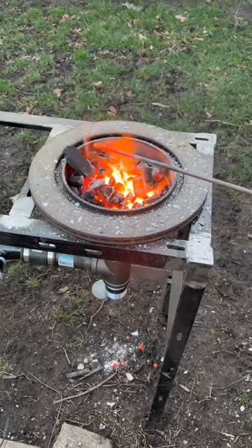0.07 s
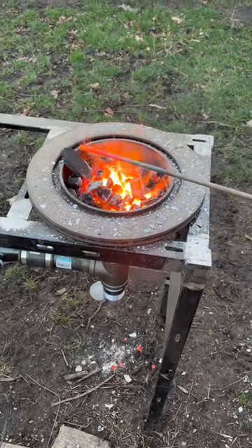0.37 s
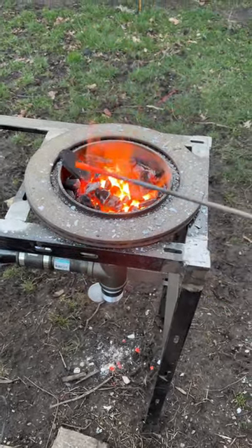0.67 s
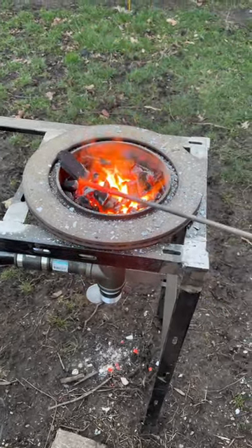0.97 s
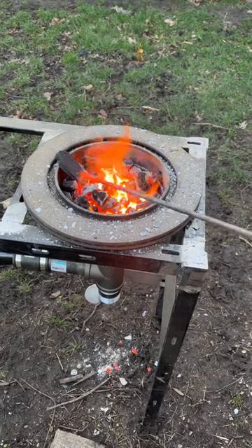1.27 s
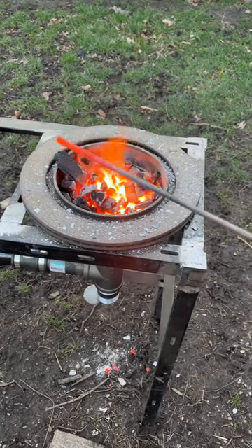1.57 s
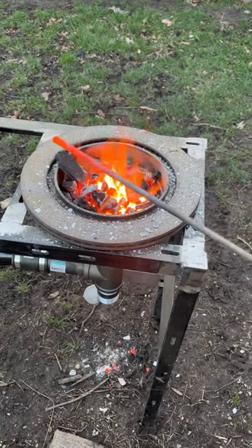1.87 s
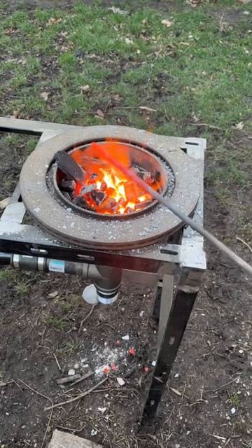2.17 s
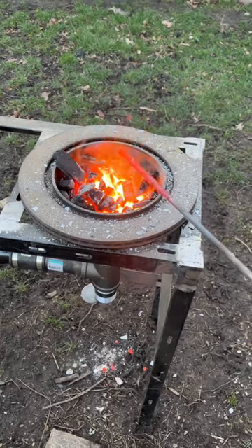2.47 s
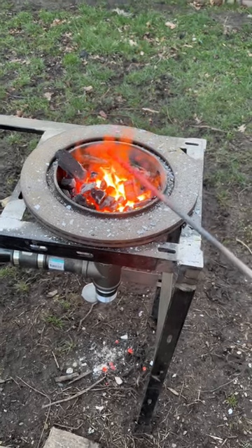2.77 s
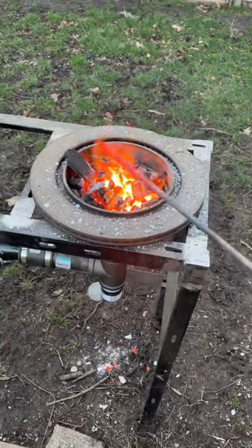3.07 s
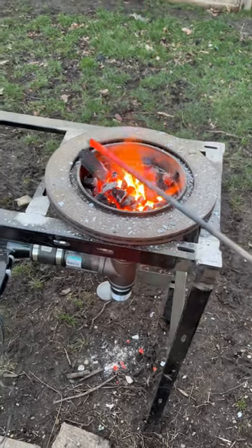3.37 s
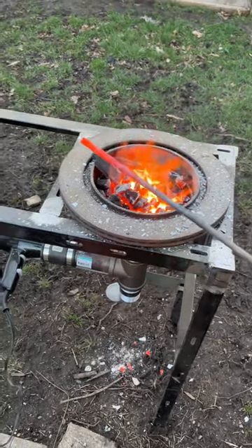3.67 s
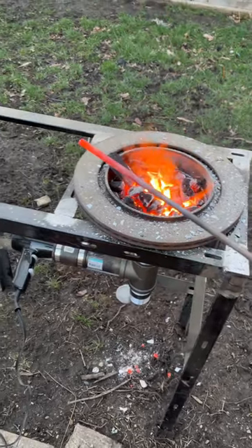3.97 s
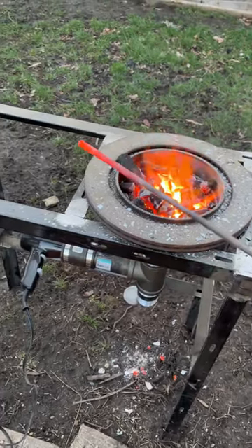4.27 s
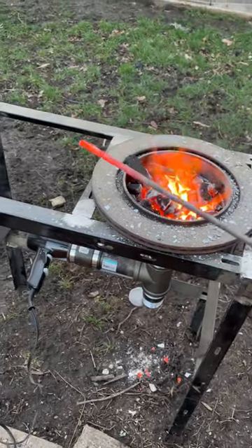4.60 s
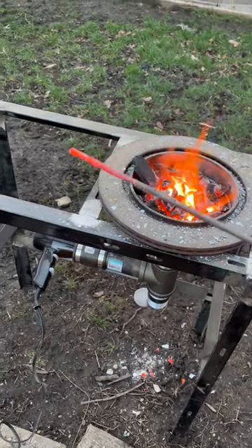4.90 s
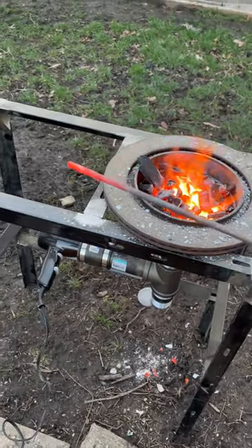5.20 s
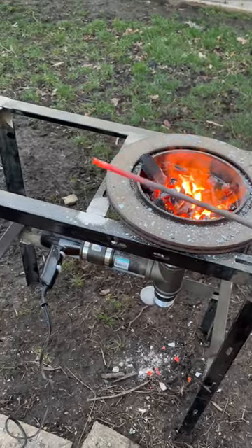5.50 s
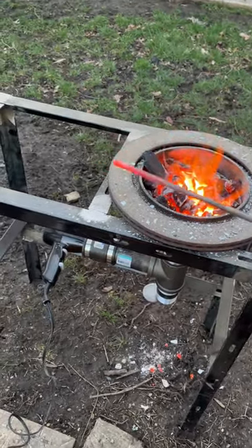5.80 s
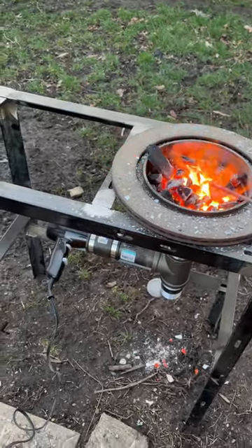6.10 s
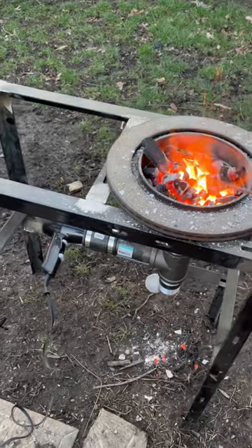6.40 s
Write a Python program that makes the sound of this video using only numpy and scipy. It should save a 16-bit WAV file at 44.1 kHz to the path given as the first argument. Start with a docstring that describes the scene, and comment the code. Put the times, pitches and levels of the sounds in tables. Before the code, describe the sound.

Heard from a hand-held microphone a step from an outdoor coal forge, an electric blower runs throughout with a constant mid-pitched note and air rushing through a pipe. The flames add an even, low roar. Two crisp coal snaps come early, with scattered lighter crackles after them and another clear snap near the end. Far off, an engine faintly gathers speed during the second half.

```python
"""An electric blower feeds a small outdoor forge, heard from a hand-held microphone a step away.
Its blades chop the air into a note at four times the shaft rate, turbulence excites the resonances
of housing and pipe, and the motor adds a fine high whine. The fire rumbles, and now and then a coal
fractures with a snap. Far off, an engine gathers speed, swelling and fading as it climbs."""
import sys
import numpy as np
from scipy import signal
from scipy.fft import rfft, irfft, next_fast_len
from scipy.io import wavfile
from scipy.ndimage import uniform_filter1d, map_coordinates

SR = 44100
rng = np.random.default_rng(int(sys.argv[2]) if len(sys.argv) > 2 else 0)


def store_wav(level_fs):
    """Save 16-bit WAV to argv[1]."""
    pcm = np.round(np.clip(np.atleast_2d(level_fs), -1, 1) * 32767)
    wavfile.write(sys.argv[1], SR, pcm.T.astype(np.int16))


N = 293265

# Blade-passing frequency of the blower. Each row: time in seconds, frequency in Hz.
BLADE_PITCH = [(0.1, 622.4), (1.3, 623.8), (1.95, 620.2), (2.3, 621.4), (2.6, 621.7), (3.45, 622.7),
               (3.85, 624.7), (4.35, 624), (4.9, 621.5), (5.3, 622.9), (6.55, 624.4)]
# Spectrum of the rushing air. Each row: frequency in Hz, relative spectral density in dB.
AIR_SPECTRUM = [(120, -47), (260, -19.5), (450, -17), (520, -13.5), (585, -5.5), (670, -3.5), (800, -14),
                (1050, -26), (1900, -25.5), (2350, -30.5), (4300, -32), (5700, -33.5), (6400, -31),
                (7200, -31.5), (8200, -33.5), (10000, -43), (12200, -38), (13500, -47), (14500, -52),
                (16000, -66)]
# Resonances of housing and pipe. Each row: centre in Hz, width in Hz, lift in dB.
DUCT_MODES = [(350, 89, 5.5), (583, 97, 3), (891.6, 145, 10.5), (1239, 130, 8), (1504, 206, 9.0),
              (1757, 154, 7), (2017, 150, 7.5), (2189, 70, 8), (2477, 160, 8.5), (2763, 220, 6.5),
              (3206, 290, 9), (3724, 73, 7), (4130, 230, 6.5), (4660, 100, 8.5), (5130, 340, 6)]
# Partials of the motor whine. Each row: multiple of the shaft rate, relative level in dB.
MOTOR_ORDERS = [(7, -63.5), (8, -62.5), (9, -62.5), (11, -63), (12, -66.5), (14, -68.5), (15, -69.5),
                (21, -68), (24, -75), (27, -74), (33, -74), (35, -70), (39, -83), (40, -76), (44, -73),
                (48, -80), (50, -79), (51, -76), (55, -74.5), (56, -75.5), (57, -78), (60, -73),
                (61, -74.5), (63, -91), (64, -87), (65, -78), (67, -80), (68, -91), (71, -77), (73, -75.5),
                (75, -78), (77, -82), (86, -85)]
# Spectrum of the fire's roar. Each row: frequency in Hz, relative spectral density in dB.
ROAR_SPECTRUM = [(15, -38), (30, -30), (42, -5), (58, 1.5), (90, -2), (130, -3), (165, -2.5), (230, -2.5),
                 (285, -7), (335, -1.5), (430, -16.5), (600, -39.5)]
# Snapping coals. Each row: start in seconds, peak level in dB, centre in Hz, half-width in octaves,
# time for the splinters to fall 60 dB in seconds.
COAL_SNAPS = [(.6737, -17, 12000, .85, 0.0024), (1.0457, -15, 7900, .62, 0.004),
              (2.068, -38, 11000, .9, .008), (2.083, -41, 8000, .9, .008), (2.1968, -30, 6760, .8, .003),
              (2.8135, -22.5, 10000, .58, .006), (2.8225, -35, 12000, .57, .005),
              (3.2561, -36.5, 11500, .6, .004), (3.7306, -30, 6000, .7, .004),
              (4.1515, -35, 11500, .6, .004), (5.9277, -31.5, 10800, .3, 0.013),
              (5.9581, -18.5, 14000, 1, .004), (5.9702, -41, 13000, .4, 0.0045),
              (6.5577, -34, 12500, .45, .006)]
# Envelope of the engine's lower note. Each row: time in seconds, level in dB.
LOWER_NOTE_LEVELS = [(3.0, -62), (3.6, -52), (3.95, -47), (4.15, -61), (4.65, -63), (4.8, -45), (4.93, -51),
                     (5.1, -38.5), (5.36, -37), (5.5, -47), (5.61, -39), (5.8, -39.5), (6.02, -51),
                     (6.32, -40.5), (6.52, -60)]
# Envelope of the engine's upper note. Each row: time in seconds, level in dB.
UPPER_NOTE_LEVELS = [(2.5, -62), (2.85, -45), (3.05, -58), (3.28, -47.5), (3.85, -55), (4.1, -53.5),
                     (5.2, -58), (5.55, -60), (5.8, -49.5), (6.1, -48), (6.65, -50.5)]
# The two microphone ports. Each row: frequency in Hz, left minus right level in dB,
# coherence of the noise from 0 to 1.
PORT_BALANCE = [(70, 0, 0.99), (252, -2, 0.87), (430, 1.7, 0.93), (605, -4, 0.86), (804, -2, 1),
                (1050, 1.5, 0.97), (1310, 2, 0.89), (1700, -0.4, 0.99), (2400, -1.9, 0.92), (3220, 0, 0.6),
                (4530, -6.5, 0.5), (5400, -1.5, 1), (8850, 0, 1), (14000, 0, 1)]
# Phase difference between the ports. Each row: frequency in Hz, lead of the left port in radians.
PORT_PHASE = [(0, 0.5), (100, 0), (300, -0.03), (600, -0.76), (900, -0.28), (1450, -0.35), (1900, 0.2),
              (2500, 3), (3000, 3), (3750, 1.05), (4400, 1.74), (4850, 1.2), (6000, 3.1), (10300, 9.4),
              (14700, 15.5), (16000, 16.5)]

TIME = np.arange(N) / SR


def blower():
    """Directivity: tone, treble and pipe whistle change level as the microphone swings to the blower."""
    swing = ramp(start_s=3.05, length_s=2.2)
    turns_hz = envelope(BLADE_PITCH) / 4
    shaft = phase_of(turns_hz + 0.029 * wobble(14))
    whir = duct_air() + motor_whine(shaft) + brush_buzz(shaft)
    treble = filtered(whir, lambda hz: 1 - bell(hz, 0, 12000))
    treble_change = (amp(-1.7 * swing) - 1) * treble  # treble radiates directionally
    whistle = amp(-72.5 + 11.5 * swing) * turbulence(lambda hz: bell(hz, 5075, 240), patchy_db=2.5)
    return whir + treble_change + whistle + magnetic_hum() + blade_tone(shaft, level_db=-32.5 - swing)


def blade_tone(shaft, level_db, flutter_db=-0.13, unbalance_db=-59.5):
    """Periodic forcing: four blade passes a turn make the main note; unbalance hums at the shaft rate."""
    note = amp(level_db + flutter_db * wobble(25)) * np.sin(4 * shaft)
    return np.sqrt(2) * (note + amp(unbalance_db) * np.sin(shaft))


def duct_air(level_db=-39.5):
    """Resonance: housing and pipe lift bands of the broad noise of the airflow."""
    def spectrum(hz):
        lift_db = sum(db * bell(hz, centre, width) for centre, width, db in DUCT_MODES)
        return amp(along(AIR_SPECTRUM, hz) + lift_db)
    return amp(level_db) * turbulence(spectrum, patchy_db=0.84)


def motor_whine(shaft, gain_db=-1.4, drift_db=1.5, flicker_db=2.0, swell_order=56):
    """Shaft harmonics: each swells and fades as the microphone moves through its sound field."""
    whine = np.zeros(N)
    swell_db = 8 * bell(TIME, 3.25, 0.55)  # one high partial, near 8.7 kHz, swells briefly around 3.25 s
    for order, db in MOTOR_ORDERS:
        level_db = db + gain_db + drift_db * wobble(1.59) + flicker_db * wobble(22)
        if order == swell_order:
            level_db += swell_db
        whine += amp(level_db) * np.sin(order * shaft + rng.uniform(0, 2 * np.pi))
    return np.sqrt(2) * whine


def brush_buzz(shaft, level_db=-73.5):
    """Sliding friction: the brushes scrape over the same roughness on every turn."""
    roughness = signal.resample(rng.standard_normal(204), 4096)
    position = np.arange(len(roughness)) / len(roughness)
    scrape = np.interp(shaft / (2 * np.pi), position, roughness, period=1)
    buzz = filtered(scrape, lambda hz: bell(hz, 7500, 12000) * (1 - bell(hz, 0, 2500)))
    return amp(level_db) * unit(buzz)


def magnetic_hum(hz=600, level_db=-58.5):
    """Beating: the motor's steady magnetic hum lies just below the blade tone and interferes with it."""
    return np.sqrt(2) * amp(level_db) * np.sin(phase_of(np.full(N, hz)))


def fire():
    """Turbulent combustion: blown flames roar evenly and flutter in the bass."""
    roar_gain = amp(-46.5 + 1.3 * wobble(5.8))
    roar = turbulence(lambda hz: amp(along(ROAR_SPECTRUM, hz)), patchy_db=-0.04)
    flutter_gain = amp(-55.5 + 1.5 * wobble(7.2))
    flutter = turbulence(lambda hz: bell(hz, 69, 25), patchy_db=1.0)
    return roar_gain * roar + flutter_gain * flutter


def coal_snap(centre_hz, octaves, t60, onset, splinter_db=-14):
    """Brittle fracture: a sharp pulse at sample onset, then splinters that die in milliseconds."""
    t = np.arange(2048) / SR
    splinters = rng.standard_normal(len(t)) * amp(splinter_db - 60 * t / t60)
    burst = np.where(t == 0, 1, splinters)
    hz = np.fft.rfftfreq(len(t), 1 / SR)
    bright_band = 1 / (1 + (np.log2((hz + 1) / centre_hz) / octaves) ** 2)
    knock = amp(-17) * bell(hz, 1900, 900)  # the lump knocks dully under the snap
    crack = irfft(rfft(np.roll(burst, onset)) * (bright_band + knock))
    return crack / np.abs(crack).max()


def crackle(tick_db=-50, spread_db=7, count=24):
    """Superposed impulses: a few clear snaps of coal among many tiny random ticks."""
    ticks = [(when * N / SR, tick_db + spread_db * strength, 8000 + 5000 * pitch, 0.66, 0.004)
             for when, strength, pitch in rng.random((count, 3))]
    onset = 64  # samples of room ahead of each pulse
    out = np.zeros(N + SR)
    for start_s, db, centre_hz, octaves, t60 in list(COAL_SNAPS) + ticks:
        crack = coal_snap(centre_hz, octaves, t60, onset)
        start = max(round(start_s * SR) - onset, 0)
        out[start:start + len(crack)] += amp(db) * crack
    return out[:N]


def far_engine(pull_start_s=2.55, time_constant_s=2.5, low_hz=39.75, top_hz=92):
    """Exponential approach: two low notes, all that carry this far, climb together ever more slowly."""
    pulling_s = np.maximum(TIME - pull_start_s, 0)
    base_hz = top_hz - (top_hz - low_hz) * np.exp(-pulling_s / time_constant_s)
    phase = phase_of(base_hz + 0.34 * wobble(21))

    def note(ratio, levels):
        return amp(envelope(levels) + 0.2 * wobble(10)) * np.sin(ratio * phase)
    load = bell(TIME, 2.83, 0.51)  # the engine grumbles as it takes the load
    grumble = amp(-51) * load * turbulence(lambda hz: bell(hz, 65, 22), patchy_db=0)
    notes = note(0.97, LOWER_NOTE_LEVELS) + note(1.6, UPPER_NOTE_LEVELS)
    return grumble + np.sqrt(2) * ramp(pull_start_s, length_s=0.15) * notes


def far_hum(hz=91.2, level_db=-60.5, waver_db=-1.0):
    """Amplitude modulation: a faint low tone of steady pitch wavers, then fades out."""
    fade = 1 - ramp(start_s=3.4, length_s=1)
    gain = fade * amp(level_db + waver_db * wobble(4.5))
    return np.sqrt(2) * gain * np.sin(phase_of(np.full(N, hz)))


def turbulence(spectrum, patchy_db):
    """Partial coherence: stereo noise of rms 1, partly alike at the ports, with drifting strong patches."""
    cells = signal.stft(rng.standard_normal((2, N)), nperseg=512)[2]
    patches = uniform_filter1d(rng.standard_normal(cells.shape[1:]), size=6, axis=0)  # over frequency
    patches = uniform_filter1d(patches, size=14, axis=1)  # over time
    noise = signal.istft(cells * amp(patchy_db * unit(patches)), nperseg=512)[1][:, :N]

    def mid_side_response(hz):
        coherence = np.clip(along(PORT_BALANCE, hz)[1], 0, 1)
        return spectrum(hz) * np.sqrt([1 + coherence, 1 - coherence])
    mid, side = filtered(noise, mid_side_response)
    return unit(np.array([mid + side, mid - side]))


def port_response(hz):
    """Level and phase differences: each port takes half of both, at constant total power."""
    level_db = along(PORT_BALANCE, hz)[0]
    lead = np.interp(hz, *np.transpose(PORT_PHASE))
    left = amp(level_db / 2) * np.exp(1j * lead / 2)
    pair = np.array([left, 1 / left])
    return pair / np.sqrt(np.mean(np.abs(pair) ** 2, axis=0))


def direct_path(hz, lead_s=0.000241):
    """Path difference: sound straight from the hearth reaches the left port first."""
    return np.exp(1j * np.pi * lead_s * np.array([hz, -hz]))


def amp(db):
    """Decibel law: level to amplitude gain."""
    return 10 ** (np.asarray(db) / 20)


def unit(x):
    """Normalisation to rms 1."""
    return x / np.sqrt(np.mean(x ** 2) + 1e-20)


def along(rows, hz):
    """Interpolation in log frequency of each column after the first."""
    row_hz, *columns = np.transpose(rows)
    return np.squeeze([np.interp(np.log(hz + 1), np.log(row_hz + 1), column) for column in columns])


def envelope(rows):
    """Linear interpolation in time, one value a sample."""
    return np.interp(TIME, *np.transpose(rows))


def ramp(start_s, length_s):
    """Linear transition from 0 to 1."""
    return np.clip((TIME - start_s) / length_s, 0, 1)


def wobble(rate):
    """Random modulation: a smooth curve through rate knots a second."""
    coarse = np.arange(0, N + 64, 64)
    knots = rng.standard_normal(2048)
    return np.interp(np.arange(N), coarse, map_coordinates(knots, [coarse * rate / SR], mode="wrap"))


def phase_of(hz):
    """Phase as the integral of frequency."""
    return 2 * np.pi * np.cumsum(hz) / SR


def bell(x, centre, width):
    """Lorentzian curve of peak 1, with its full width taken at half height."""
    return 1 / (1 + (2 * (x - centre) / width) ** 2)


def filtered(x, response):
    """Linear filtering: the spectrum of x times a frequency response."""
    size = next_fast_len(N + SR // 4)
    return irfft(rfft(x, size) * response(np.fft.rfftfreq(size, 1 / SR)), size)[..., :N]


def scene():
    """Superposition: all sources add at the two microphone ports."""
    sustained = blower() + fire() + far_engine() + far_hum()
    return filtered(sustained, port_response) + filtered(crackle(), direct_path)


def record(dry, top_hz=15850):
    """Band limiting: nothing above top_hz passes."""
    return filtered(dry, lambda hz: hz < top_hz)


dry = scene()
out = record(dry)
store_wav(out)
```